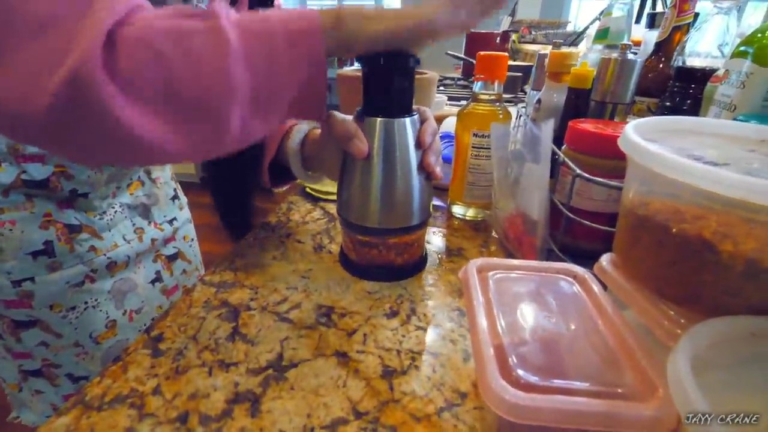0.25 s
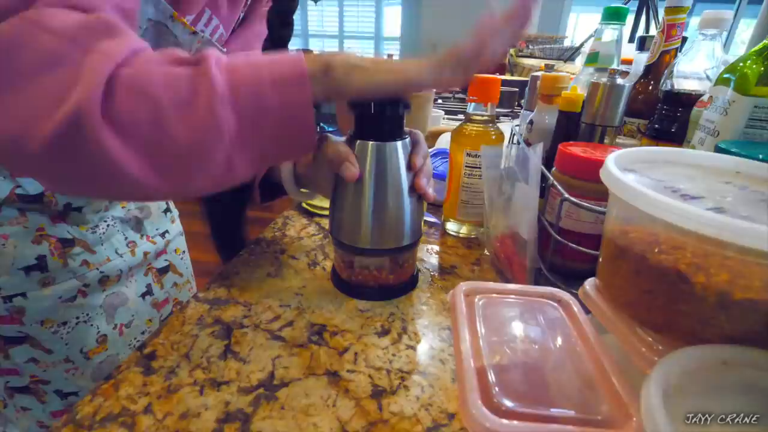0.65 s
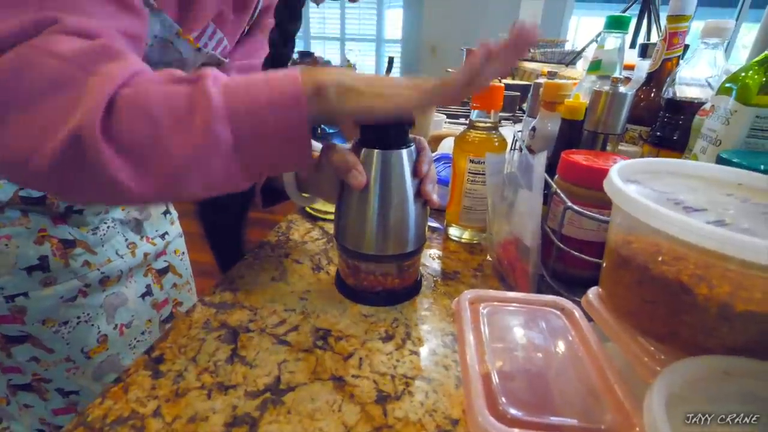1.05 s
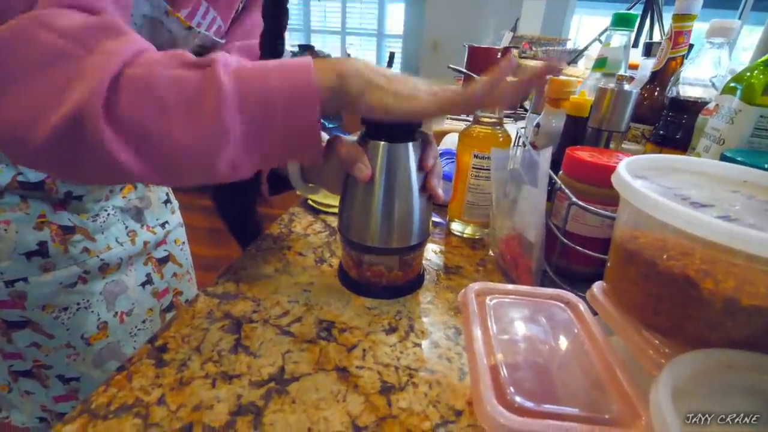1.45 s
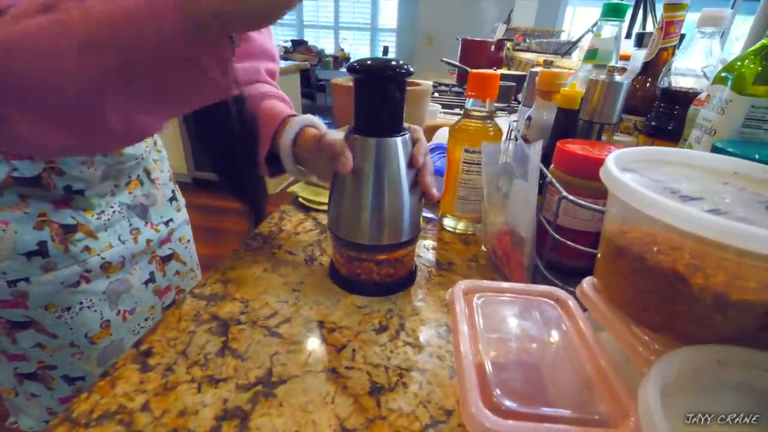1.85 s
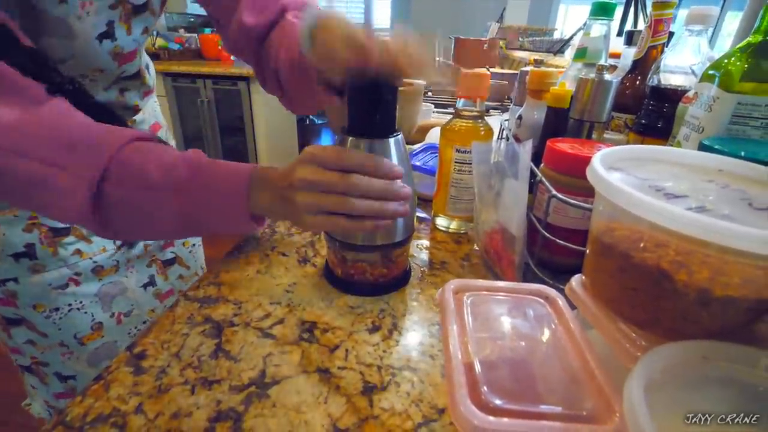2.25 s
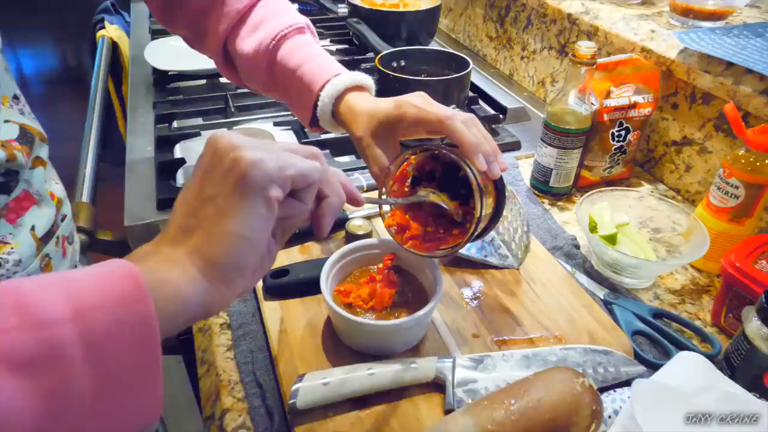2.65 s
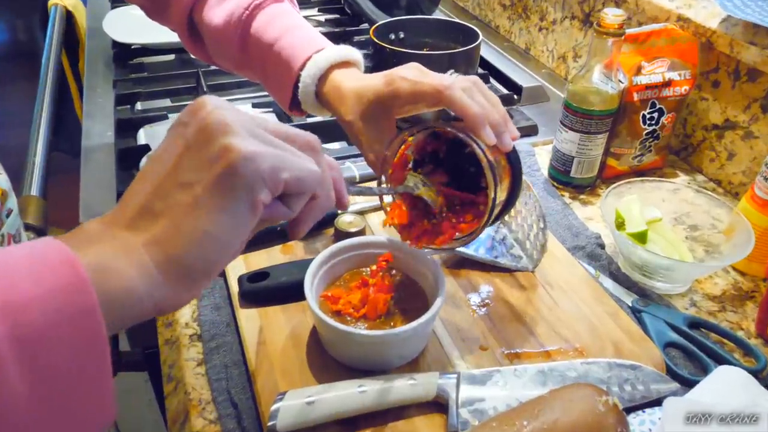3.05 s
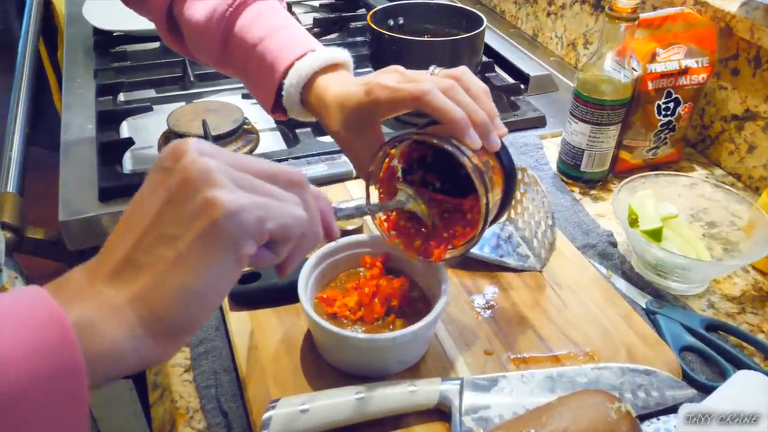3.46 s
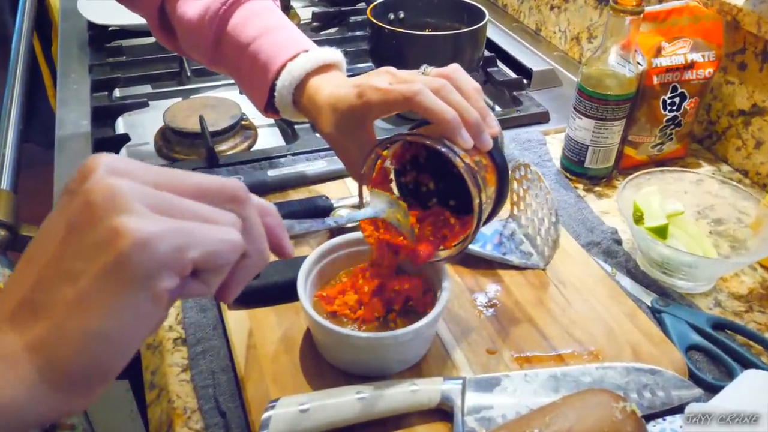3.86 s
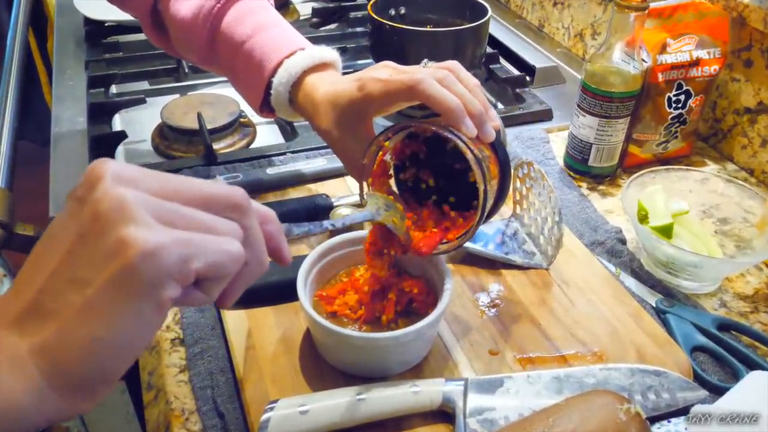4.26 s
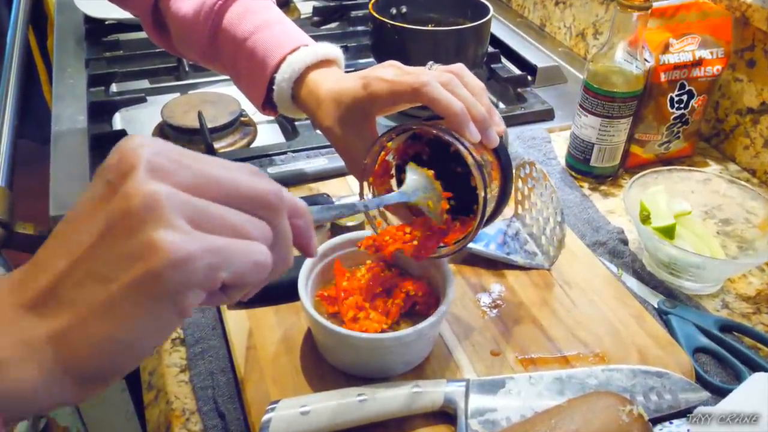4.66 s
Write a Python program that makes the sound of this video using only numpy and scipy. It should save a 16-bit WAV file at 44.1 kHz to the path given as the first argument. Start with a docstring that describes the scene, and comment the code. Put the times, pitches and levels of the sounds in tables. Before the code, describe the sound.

Close up in a lively hard-surfaced kitchen, a palm slaps a metal plunger chopper about five times a second. Each stroke gives a slap, a crunchy blade landing and a louder spring-back clack with rattle. After nine strokes comes a short gap, then two more. An abrupt cut leads to a far quieter stove side, with low hum and faint wet spoon scraping.

```python
"""A palm slaps the knob of a plunger chopper on a stone counter: the shaft slides down, the blade lands,
and the spring throws the plunger back against its stop with a clack that rings in the kitchen.
After an abrupt change of place, a spoon scrapes wet mince out of a cup over a faint appliance hum.
Blows are noise bursts exciting damped modes; friction and squelches are filtered uneven noise;
the kitchen is a convolution with sparse decaying reflections, and the hum is a set of wavering sines."""
import sys
import numpy as np
from scipy import signal
from scipy.fft import rfft, irfft
from scipy.io import wavfile
from scipy.ndimage import uniform_filter1d

SR = 44100
rng = np.random.default_rng(int(sys.argv[2]) if len(sys.argv) > 2 else 0)


def to_wav(s):
    """Save 16-bit WAV."""
    ch = np.atleast_2d(s).T  # columns
    pcm = np.round(np.clip(ch, -1, 1) * 32767)  # PCM
    wavfile.write(sys.argv[1], SR, pcm.astype(np.int16))


def undo_db(level):
    """Turn decibels back into plain size, where 20 dB means ten times bigger."""
    steps = np.asarray(level, float) / 20
    return 10 ** steps


N = 216387  # length in samples
TOP_HZ = SR / 2.2  # highest band edge


def evened(x):
    """Power normalisation: scales to rms 1."""
    return x / np.sqrt(np.mean(x ** 2) + 1e-20)


def peaked(x):
    """Short-time power normalisation: the loudest 3.4 ms get rms 1."""
    return x / np.sqrt(uniform_filter1d(x ** 2, 150).max() + 1e-20)


def read(points, hz):
    """Interpolation of a table along a logarithmic frequency axis."""
    f, value = np.transpose(points)
    return np.interp(np.log(hz + 1), np.log(f + 1), value)


def coloured(x, points):
    """Spectral shaping: weights each Fourier component by a table of f/Hz, level/dB."""
    hz = np.fft.rfftfreq(len(x), 1 / SR)
    return irfft(rfft(x) * undo_db(read(points, hz)), len(x))


def band(x, lo_hz, hi_hz):
    """Causal Butterworth band-pass filtering."""
    sos = signal.butter(2, [lo_hz, min(hi_hz, TOP_HZ)], "band", fs=SR, output="sos")
    return signal.sosfilt(sos, x)


def add(mix, s, sound):
    """Superposition: adds a sound to the mix from time s."""
    part = mix[max(round(s * SR), 0):][:len(sound)]
    part += sound[:len(part)]


# palm on the knob: t/s, level/dB, low band/dB, treble re middle/dB, wait before the shaft slides/ms
PALM_SLAPS = [(0.0062, -20.5, -11, 7.5, 1.18), (0.2153, -16, 0, 3.5, 1.56), (0.4353, -18.5, -2, 6.5, 0.85),
              (0.6439, -15, -2.5, 5.5, 0.86), (0.8507, -13.5, -1.5, -1, 0.85), (1.051, -15, -3.5, 2, 0.84),
              (1.2602, -16, -5.5, 4, 1.49), (1.457, -20.5, -9.5, 2, 0.55), (1.6619, -26.5, -7, 12, 1.05),
              (2.2976, -17.5, -4.5, 11.5, 9.6), (2.5086, -28.5, -15.5, 12, 1.3)]
# blade reaches the bottom: t/s, level/dB, low band re level/dB, treble re middle/dB, counter thump/dB
BLADE_LANDINGS = [(0.0266, -21, -5.5, -0.5, -25.5), (0.2338, -13.5, -7.5, -5, -22.5),
                  (0.4542, -15, -7, -0.5, -26.5), (0.663, -13.5, -5, 0, -25),
                  (0.871, -11.5, -18, -5.5, -31), (1.0728, -19.5, -12, -8, -30),
                  (1.281, -13.5, -8.5, -4.5, -27), (1.4808, -27.5, -7, -9.5, -33),
                  (1.6851, -29, 0, -22.5, -33), (2.3195, -20, -17.5, -6, -26.5),
                  (2.5251, -17, -8, -0.5, -46)]
# plunger hits its upper stop: t/s, level/dB, cup knock/dB, treble re middle/dB, shell ring/dB
STOP_CLACKS = [(0.0889, -10, -9.5, -4.5, -20), (0.3103, -11, -15.5, -2.5, -13.5),
               (0.517, -10.5, -11.5, -4, -13), (0.7262, -15, -17, -5.5, -13),
               (0.9342, -12.5, -11.5, -3, -13), (1.1391, -15, -14, -4, -13.5),
               (1.349, -17.5, -15, 0.5, -13), (1.5571, -15, -19, 1.5, -15), (1.7993, -11, -17, -6, -21),
               (2.4026, -9, -13, -8.5, -21), (2.61, -9.5, -13.5, -7.5, -24.5)]
# each stroke: slide down/dB, spring rubbing on the way up/dB, cup knock f/Hz,
# shell mode that the stop favours f/Hz, blades singing on/dB
STROKE_DETAILS = [(-25.5, -35, 612, 1900, -47), (-25, -39, 580, 3215, -46), (-25, -35.5, 607, 3600, -48),
                  (-27, -40, 596, 3188, -48), (-27.5, -37.5, 640, 3320, -47.5),
                  (-27, -41.5, 610, 3205, -46.5), (-29.5, -37.5, 690, 3240, -50.5),
                  (-33, -42.5, 450, 3188, -46.5), (-28, -49, 625, 3100, -43),
                  (-22.5, -40.5, 475, 4000, -38.5), (-26.5, -36, 652, 3195, -51)]


def chopper():
    """Successive excitation of coupled parts: slap, slide, landing, rise and clack in every stroke."""
    out = np.zeros(N)
    strokes = zip(PALM_SLAPS, BLADE_LANDINGS, STOP_CLACKS, STROKE_DETAILS)
    for slap, landing, clack, (slide_db, rise_db, knock_hz, ring_hz, sing_db) in strokes:
        palm_slap(out, *slap[:4])
        slide_start = slap[0] + slap[4] / 1000
        add(out, slide_start, rubbing(slide_start, landing[0] + .002, slide_db, growth_db=-4, ring=.6))
        blade_landing(out, *landing, knock_hz)
        add(out, landing[0], rubbing(landing[0], clack[0], rise_db, growth_db=0.5, ring=0.63))
        stop_clack(out, *clack, knock_hz, ring_hz, sing_db)
    catches(out)
    rattles(out)
    pings(out)
    return band(band(out, 75, 19500), 95, 19500)


REBOUND_MS = 1.4  # decay of the chatter in a bounce

# hollow knob under the palm: f/Hz, relative level/dB, t60/s
KNOB_MODES = [(530, -9, 0.017), (1090, -2, 0.015), (1172, -0.5, 0.013), (1656, -1, 0.021)]


def palm_slap(out, s, db, low_db, treble_db):
    """Impact excitation: skin touches the knob, the blow shakes knob and shaft, and the knob bounces once."""
    knob = ringing(KNOB_MODES, 2.3, .02)
    add(out, s - .001, blow(shaft(), db, low_db, treble_db, decay_ms=2.4, ring=0.077, hollow=knob, top_db=2.0))
    touch = band(burst(1.0, rise_ms=1.7), 3194, 19000)  # skin meets the knob just before the blow
    add(out, s - .002, undo_db(db + treble_db - 10.5) * peaked(touch))
    bounce = blow(shaft(), db - 17.5, 0, treble_db - 3, REBOUND_MS, ring=0.11, top_db=0.5)
    add(out, s + 0.0025, bounce)


# stone counter: f/Hz, relative level/dB, t60/s
COUNTER_MODES = [(120.7, 2, 0.056), (191, 4.5, 0.07)]


def blade_landing(out, s, db, low_db, treble_db, thump_db, knock_hz):
    """Impact through a yielding layer: a sharp blow on the cup and a smoothed push on the counter."""
    hit = blow(shaft(), db, low_db, treble_db, decay_ms=3.66, ring=0.067, hollow=cup(knock_hz), top_db=4.5)
    add(out, s - .001, hit)
    push = np.hanning(90)  # the blade sinks through the peppers: a soft push
    thump = np.convolve(ringing(COUNTER_MODES, 1.546, 0.065), push)
    add(out, s - .003, undo_db(thump_db) * peaked(thump))


# steel shell and cap: f/Hz, relative level/dB, t60/s
SHELL_MODES = [(1230, -24, 0.018), (2340, 7, 0.005), (2970, -19, 0.02), (3098, -11.5, 0.022),
               (3188, -4.5, 0.06), (3258, -2.5, 0.049), (3320, -7.5, .045), (3400, -11.5, 0.03),
               (3495, -10, .04), (3780, -2.5, 0.01), (4515, -9.5, .034), (4880, -9.5, 0.04),
               (5600, 6, 0.007), (6470, 6.5, 0.0047), (8140, 4.5, 0.0047)]
# thin steel blades: f/Hz, relative level/dB, t60/s
BLADE_MODES = [(3000, -2.5, 0.67), (3000, -10.5, 0.88), (3192, -6.5, .6), (3250, -3, .5), (3468, -3, 0.77),
               (3630, -5, .5), (3660, -7.5, .6), (4530, -8, .5)]


def stop_clack(out, s, db, knock_db, treble_db, ring_db, knock_hz, ring_hz, sing_db):
    """Modal excitation by a hard stop: shell, cup and blades ring, the plunger rebounds, the spring jitters."""
    shell = ringing(SHELL_MODES, spread_db=2.5, detune=.004)
    rung = ringing(SHELL_MODES, spread_db=1.5, detune=.002, favoured_hz=ring_hz)
    singing = ringing(BLADE_MODES, spread_db=2, detune=.001, size=SR // 2)
    add(out, s, undo_db(sing_db) * singing)
    add(out, s - .0005, blow(shell, db, -5.5, treble_db, decay_ms=3.4, ring=0.4, top_db=-6.0))
    add(out, s + 0.0036, blow(shell, db - 8.5, -6.5, treble_db + 9.5, REBOUND_MS, ring=0.24))
    add(out, s, -undo_db(knock_db) * peaked(cup(knock_hz)))
    shell_ring = band(signal.fftconvolve(burst(1.2), rung)[:6000], 2724, 3600)
    add(out, s, undo_db(ring_db) * peaked(shell_ring))
    add(out, s + 0.0072, shiver(db - 19))


# hollow cup: ratio to the knock's f, relative level/dB, t60/s
CUP_MODES = [(1.02, 15, 0.031), (2.007, 16, 0.0091), (0.61, -11, 0.03)]
# the cap over the cup: f/Hz, relative level/dB, t60/s
CAP_MODE = (508, 11, 0.018)


def cup(knock_hz):
    """Modal resonance: the hollow cup's knock at a given pitch, with the cap's own note."""
    modes = [(knock_hz * ratio, db, t60) for ratio, db, t60 in CUP_MODES]
    return band(ringing(modes + [CAP_MODE], 1.2, 0.011), 250, 2800)


# shaft pushed down: f/Hz, width/Hz, relative level/dB
SHAFT_RESONANCES = [(1080, 250, -4), (1640, 370, -5), (2985, 90, 1), (3990, 250, -10), (4880, 140, -4),
                    (6400, 450, -11), (8000, 200, -7), (10500, 400, -16)]


def shaft():
    """Bandwidth-decay reciprocity: each resonance dies in a t60 of 2.2 over its width."""
    modes = [(hz, db, 2.2 / width) for hz, width, db in SHAFT_RESONANCES]
    return ringing(modes, spread_db=3, detune=.015)


def rubbing(start, end, db, growth_db, ring):
    """Friction excitation: uneven drag, heard directly and through the shaft's modes."""
    size = round((end - start) * SR)
    uneven = undo_db(2.5 * evened(uniform_filter1d(rng.standard_normal(6000), 60)))
    drag = rng.standard_normal(6000) * uneven
    direct = band(drag, 300, 5500) + 0.55 * band(drag, 280, 700) + .4 * band(drag, 12000, TOP_HZ)
    shaken = signal.fftconvolve(drag, shaft())[:6000]
    sound = evened(direct) + ring * evened(shaken)
    shape = undo_db(np.linspace(-growth_db, 0, size)) * signal.windows.tukey(size, .15)
    return undo_db(db) * evened(sound)[:size] * shape


def shiver(db):
    """Random impulse train: irregular ticks of the loose spring against the shaft, fading away."""
    duration_s, ticks_per_s, fade_db = .045, 1400, -24
    size = round(duration_s * SR)
    luck = rng.random((size, 3))
    ticks = (luck[:, 0] < ticks_per_s / SR) * undo_db(-4 * np.log(luck[:, 1] + .02))
    grit = signal.lfilter([1], [1, -.97], ticks) * (luck[:, 2] - .5)
    sound = evened(band(grit, 1500, 8000)) + .25 * evened(band(grit, 8000, 13000))
    return undo_db(db + fade_db * np.linspace(0, 1, size)) * sound


# the blades brush their guide just before a blow: t/s, level/dB, treble re middle/dB
GUIDE_CATCHES = [(.075, -30, -2), (0.296, -29.5, -2), (0.496, -32.5, 1), (0.711, -32, -14.5),
                 (.919, -37.5, 5), (1.127, -38, 2), (1.514, -37.5, -1), (1.54, -34.5, -5),
                 (1.78, -31.5, -5.5), (2.24, -67, 7), (2.257, -63.5, 3), (2.277, -47.5, -7.5),
                 (2.284, -50, 0)]


def catches(out):
    """Grazing contact: slowly rising chatter drives the shell modes around 3195 Hz."""
    for s, db, treble_db in GUIDE_CATCHES:
        shell = ringing(SHELL_MODES, favoured_hz=3195)
        add(out, s - .0005, blow(shell, db, -1.5, treble_db, decay_ms=4.7, ring=0.2, rise_ms=2.7))


# rattles of the loose shaft and spring: t/s, level/dB, treble re middle/dB, favoured mode f/Hz
LOOSE_RATTLES = [(0.011, -24, 2.5, 2970), (0.096, -24.5, -1, 3495), (0.107, -28.5, -3, 3195),
                 (.266, -37, -0.5, 7800), (0.281, -35, -6, 2970), (0.226, -27, -6, 7760),
                 (0.3131, -20, 2.5, 3320), (1.142, -19, 4.5, 5600), (1.354, -19.5, 3.5, 6470),
                 (.443, -22, -2, 2970), (0.654, -27.5, -7.5, 2970), (0.73, -16, 2, 6470),
                 (0.737, -25, -10, 3195), (0.943, -24, 0.5, 7720), (1.0544, -23.5, 3.5, 7950),
                 (1.06, -24, -5, 2970), (1.318, -35.5, 3.5, 7900), (1.262, -21.5, -0.5, 8140),
                 (1.27, -32, -0.5, 2970), (1.5649, -18.5, -1, 3495), (1.366, -28.5, -2.5, 5600),
                 (0.677, -29, -4, 2970), (1.6629, -21, -0.5, 3780), (1.675, -27.5, -4, 3195),
                 (1.806, -18.5, -1.5, 3406), (2.31, -24, 1.5, 1230), (2.421, -23.5, -4, 3195),
                 (2.588, -30, -7, 5400), (2.623, -22.5, 0, 3195)]


def rattles(out):
    """Localised excitation: each chatter of loose parts favours the shell modes near its contact."""
    for s, db, treble_db, favoured_hz in LOOSE_RATTLES:
        shell = ringing(SHELL_MODES, favoured_hz=favoured_hz)
        add(out, s - .0005, blow(shell, db, -4, treble_db, decay_ms=5.2, ring=.3))


# one shell mode struck cleanly: t/s, level/dB, mode f/Hz
CLEAN_PINGS = [(.0105, -22.5, 2970), (.217, -25, 2970), (.3138, -19, 4515), (.4365, -23, 4880),
               (.441, -22.5, 2970), (.645, -23, 4880), (1.2605, -18, 4880), (1.262, -21.5, 2970),
               (1.355, -20, 3258), (1.673, -26, 3188)]


def pings(out):
    """Single-mode response: a short burst rings only the nearest shell mode."""
    for s, db, mode_hz in CLEAN_PINGS:
        nearest = min(SHELL_MODES, key=lambda mode: abs(mode[0] - mode_hz))
        add(out, s, undo_db(db) * peaked(signal.fftconvolve(burst(1.2), ringing([nearest]))[:6000]))


def ringing(modes, spread_db=0., detune=0., favoured_hz=None, size=6000):
    """Modal superposition: damped sines whose levels and pitches vary a little from blow to blow."""
    t = np.arange(size) / SR
    luck = np.clip(rng.standard_normal((len(modes), 2)), -1.5, 1.5)
    out = np.zeros(size)
    for (hz, db, t60), (level_luck, pitch_luck) in zip(modes, luck):
        # a contact at one spot drives the nearest mode and hardly the others
        far_db = 0 if favoured_hz is None else min(150 * abs(np.log2(hz / favoured_hz)), 22)
        decay = undo_db(db - far_db + spread_db * level_luck - 60 * t / t60)
        out += decay * np.sin(2 * np.pi * hz * (1 + detune * pitch_luck) * t)
    return out


def burst(decay_ms, rise_ms=0.67):
    """Contact chatter: spiky noise that starts fast and decays exponentially, with one hard first contact."""
    t = np.arange(3000) / SR * 1000  # ms
    noise = rng.standard_normal((3000, 2))
    spiky = noise[:, 0] * undo_db(3 * noise[:, 1])
    chatter = spiky * (1 - np.exp(-t / rise_ms)) * np.exp(-t / decay_ms)
    first_contact = .8 / rise_ms * np.exp(-((t - .6) / 0.023) ** 2)
    return chatter - first_contact


def blow(body, db, low_db, treble_db, decay_ms, ring, rise_ms=0.35, hollow=None, top_db=-9):
    """Source-filter principle: chatter heard directly and through a body; a hollow part may colour its low end."""
    force = burst(decay_ms, rise_ms)
    through_body = signal.fftconvolve(force, body)[:3000]
    sound = (1 - ring) * peaked(force) + ring * peaked(through_body)
    low = band(sound, 400, 1600)
    if hollow is not None:
        low = 0.2 * peaked(low) + peaked(signal.fftconvolve(force, hollow)[:3000])
    middle = band(sound, 2260, 4340)
    top = band(force / np.abs(force).max(), 14000, TOP_HZ)
    treble = band(band(sound, 3500, TOP_HZ), 4400, 9300) + undo_db(top_db) * top
    level = np.sqrt(uniform_filter1d(middle ** 2 + treble ** 2, 150).max())
    return undo_db(db) * (undo_db(low_db) * peaked(low) + (middle + undo_db(treble_db) * treble) / level)


def spoon():
    """Granular contact noise: squelches, rasps of the spoon's edge and single ticks."""
    out = np.zeros(N)
    uneven = undo_db(3 * evened(uniform_filter1d(rng.standard_normal(N), 160)))
    grains = rng.standard_normal(N) * uneven
    squelches(out, grains)
    rasps(out, grains)
    ticks(out)
    return out


# spoon squelching through the mince: start t/s, end t/s, level/dB, treble re body/dB
MINCE_SQUELCHES = [(2.683, 2.764, -55.5, -2), (2.885, 2.914, -59, 0), (2.996, 3.117, -73.5, 3),
                   (3.178, 3.211, -57, -3), (3.275, 3.372, -65.5, 0), (3.394, 3.465, -72, 5),
                   (3.606, 3.822, -76, 8), (4.05, 4.11, -70, -3), (4.17, 4.279, -68.5, 5),
                   (4.408, 4.749, -66.5, -6)]


def squelches(out, grains):
    """Bubble noise: grains swell with randomly timed bursting bubbles."""
    crackles_per_s = 160
    crackles = (rng.random(N) < crackles_per_s / SR) * undo_db(3.5 * np.minimum(rng.exponential(1, N), 3))
    wet = grains * (1 + signal.lfilter([1], [1, -.96], crackles))
    body = evened(band(wet, 2300, 5300))
    treble = evened(band(band(wet, 3000, 9500), 2040, 14400))
    for start, end, db, treble_db in MINCE_SQUELCHES:
        span = slice(round(start * SR), round(end * SR))
        shape = signal.windows.tukey(span.stop - span.start, .6)  # share spent rising and falling
        add(out, start, undo_db(db) * shape * (body[span] + undo_db(treble_db) * treble[span]))


# spoon edge along the cup: start t/s, end t/s, level/dB, upper resonances/dB
EDGE_RASPS = [(3.072, 3.201, -68, -18), (3.159, 3.3, -61.5, -23), (3.27, 3.559, -61, -16),
              (3.673, 3.8, -83, 6), (4.413, 4.721, -61.5, -1.5)]
# resonances of the rasp: f/Hz, width/Hz, relative level/dB
RASP_RESONANCES = [(2380, 490, 0.5), (3040, 1240, 4.5), (6730, 670, 2.5), (9900, 650, -10)]


def rasps(out, grains):
    """Friction filtered by resonances: narrow bands of the grains, the upper ones sinking faster."""
    for start, end, db, upper_db in EDGE_RASPS:
        drag = grains[round(start * SR):round(end * SR)]
        size = len(drag)
        sinking_db = upper_db + np.linspace(1, -8, size)
        rasp = np.zeros(size)
        for k, (hz, width_hz, mode_db) in enumerate(RASP_RESONANCES):
            resonance = evened(band(drag, hz - width_hz / 2, hz + width_hz / 2))
            rasp += undo_db(mode_db + sinking_db * (k > 0)) * resonance
        fading = undo_db(np.linspace(0, -18, size))  # the edge bites, then lifts away
        add(out, start, undo_db(db) * rasp * signal.windows.tukey(size, .25) * fading)


# wet ticks and spoon taps: t/s, level/dB, centre f/Hz
SPOON_TICKS = [(2.779, -60, 7100), (2.901, -45, 6510), (2.9, -47.5, 3340), (3.085, -61, 3980),
               (3.182, -53, 4510), (3.238, -64, 9700), (3.347, -52.5, 9800), (3.366, -55, 6500),
               (3.406, -60, 5880), (3.433, -61, 10800), (3.443, -57, 10600), (3.491, -60, 3200),
               (3.661, -58, 8900), (3.755, -63, 9500), (3.963, -54, 1686), (4.063, -59, 8020),
               (4.092, -56, 5760), (4.18, -56, 3010), (4.206, -58, 11000), (4.2106, -49, 8300),
               (4.212, -58, 3400), (4.222, -51, 7800), (4.227, -60, 8830), (4.263, -58, 7470),
               (4.257, -52, 7930), (4.389, -67, 4490), (4.468, -57, 9870), (4.497, -57, 9000),
               (4.518, -63, 9800), (4.548, -57, 7050), (4.59, -63, 9900), (4.608, -57, 10020)]


def ticks(out):
    """Band-limited impulses: a narrow coloured click over a wider, weaker dry one."""
    for s, db, hz in SPOON_TICKS:
        click = burst(1.6, rise_ms=0.36)
        narrow = band(click, hz / 1.16, hz * 1.16)
        broad = band(click, hz / 1.9, hz * 1.9)
        add(out, s - .0005, undo_db(db) * peaked(peaked(narrow) + undo_db(-6) * peaked(broad)))


# decay in the kitchen: f/Hz, t60/s
KITCHEN_T60 = [(100, 0.37), (500, 0.75), (1500, 0.69), (3300, 0.94), (5000, 1), (8000, 0.75), (11000, 0.62),
               (13000, .45), (15000, 0.36)]
# spectrum of the reflections: f/Hz, relative level/dB
REFLECTION_COLOUR = [(60, -10.5), (200, 5.5), (600, 0.5), (1200, 6), (2200, 4.5), (2750, -4), (3300, -3),
                     (4000, -3.5), (6000, -2.5), (10000, -1.5), (13000, -5), (16000, -6)]


def kitchen(x):
    """Reverberation: sparse reflections of random sign, each band dying at its own speed.
    Three random sets, faded in turn about 40 times a second, smooth the tail's spectrum; low and high separately."""
    low_turns_hz, high_turns_hz, split_hz, level_db = 40, 37, 1500, -15.5
    out, t = np.zeros(N), np.arange(N) / SR
    at = np.arange(300, SR - 20, 20)  # one reflection in every 20 samples
    low = signal.sosfiltfilt(signal.butter(2, split_hz, fs=SR, output="sos"), x)
    high = x - low
    for k in range(3):
        taps = np.zeros(SR)
        taps[at + rng.integers(0, 20, len(at))] = rng.choice([-1., 1.], len(at))
        hz, tail_t, z = signal.stft(taps, SR, nperseg=256)
        decay_db = 60 * tail_t / read(KITCHEN_T60, hz)[:, None]
        z *= undo_db(read(REFLECTION_COLOUR, hz)[:, None] - decay_db)
        tail = signal.istft(z, SR, nperseg=256)[1]
        low_fade = np.sqrt(2 / 3) * np.cos(2 * np.pi * (low_turns_hz * t + k / 3))
        high_fade = np.sqrt(2 / 3) * np.cos(2 * np.pi * (high_turns_hz * t + k / 3))
        out += signal.fftconvolve(low * low_fade + high * high_fade, tail / np.linalg.norm(tail))[:N]
    return undo_db(level_db) * out


# air at the counter: f/Hz, relative level/dB
COUNTER_AIR = [(15, -13.5), (35, -1), (60, -18), (120, -15), (700, -15.5), (3000, -25.5), (7000, -41.5),
               (15000, -55.5)]


def counter_air():
    """Stationary background noise: white noise shaped to the air's spectrum."""
    return undo_db(-59.5) * evened(coloured(rng.standard_normal(N), COUNTER_AIR))


# air by the stove: f/Hz, relative level/dB
STOVE_AIR = [(12, -30), (25, 6.5), (40, -5), (75, -12.5), (158, -6), (228, -5), (293, -5), (640, -8),
             (1330, -16.5), (2100, -23.5), (3440, -23), (6000, -25), (10000, -30.5), (14000, -35),
             (16500, -40)]
# rumble of the house swelling: t/s, level/dB, deepest part/dB
RUMBLE_SWELL = [(2.69, -60.5, -63), (2.82, -68, -66), (3.089, -62.5, -73), (3.3, -58.5, -61),
                (3.58, -66.5, -82), (3.81, -68.5, -62.5), (4.0, -61.5, -59.5), (4.13, -61.5, -56),
                (4.32, -65.5, -64), (4.599, -63.5, -78), (4.9, -68, -64)]
# appliance hum: f/Hz, rms level/dB, both before wavering
HUM_TONES = [(118.4, -70), (183.0, -63.5), (204.6, -84), (242.2, -75), (301.5, -70)]


def stove_side():
    """Noise and tonal background: room air, a swelling rumble and hum tones wavering in level and pitch."""
    t = np.arange(N) / SR
    out = undo_db(-59) * evened(coloured(rng.standard_normal(N), STOVE_AIR))
    rumble_colour = [(250, -15), (450, -5.5), (700, -6.5), (1200, -7.0), (2500, -15.0), (16000, -67.0)]
    rumble = evened(coloured(rng.standard_normal(N), rumble_colour))
    deep = evened(band(rng.standard_normal(N), 246, 294))
    s, rumble_db, deep_db = np.transpose(RUMBLE_SWELL)
    out += undo_db(np.interp(t, s, rumble_db)) * rumble
    out += undo_db(np.interp(t, s, deep_db)) * deep
    for hz, db in HUM_TONES:
        waver = evened(signal.lfilter([1], [1, -.9995], rng.standard_normal(N)))
        phase = 2 * np.pi * np.cumsum(hz + 1.54 * waver) / SR
        out += np.sqrt(2) * undo_db(db + 1.7 * waver) * np.sin(phase)
    return out


def scene():
    """Superposition within each place: the chopping counter, then a hard change to the stove side."""
    change_s, ramp_s = 2.682, .002
    strokes = chopper()
    counter = strokes + kitchen(strokes) + counter_air()
    stove = stove_side() + spoon()
    after = np.clip((np.arange(N) / SR - change_s) / ramp_s, 0, 1)
    return (counter * (1 - after) + stove * after)[None]


def low_pass(x):
    """Removes everything above the highest recorded frequency."""
    return signal.sosfilt(signal.butter(12, 16820, fs=SR, output="sos"), x)


def record(dry):
    """Amplitude and band limiting: clips at full scale, then low-passes near 16 kHz, where the treble ends."""
    edge = signal.firwin(255, 15900, window=("kaiser", 8), fs=SR)
    limited = signal.oaconvolve(np.clip(dry, -1, 1), edge[None], "same")
    return low_pass(limited)


dry = scene()
out = record(dry)
to_wav(out)
```